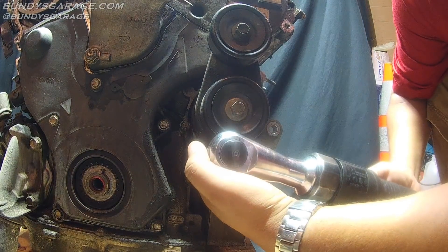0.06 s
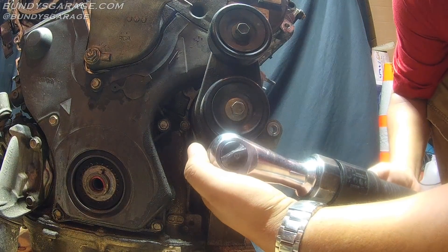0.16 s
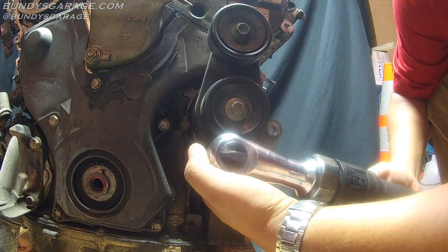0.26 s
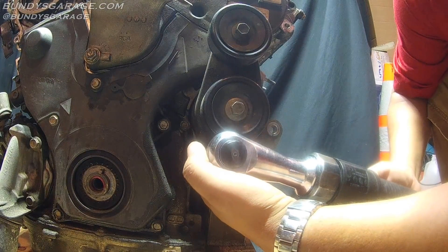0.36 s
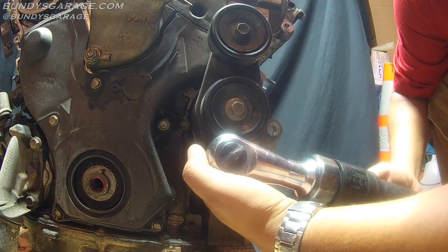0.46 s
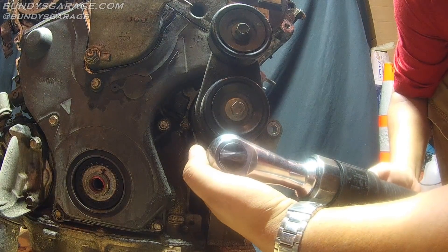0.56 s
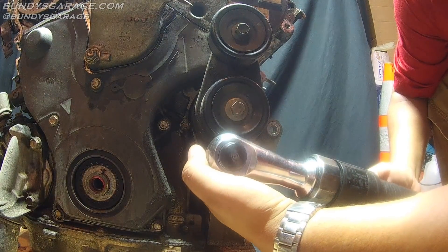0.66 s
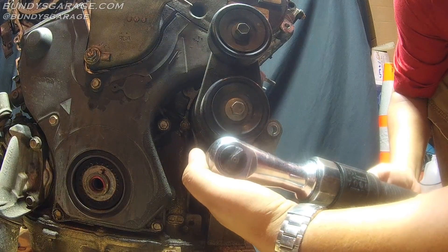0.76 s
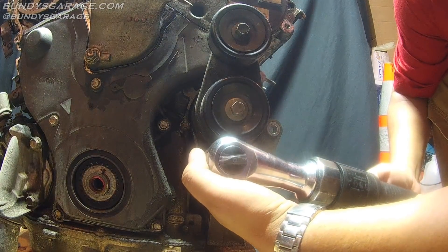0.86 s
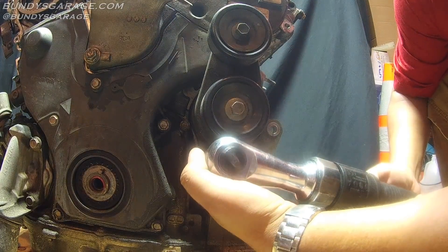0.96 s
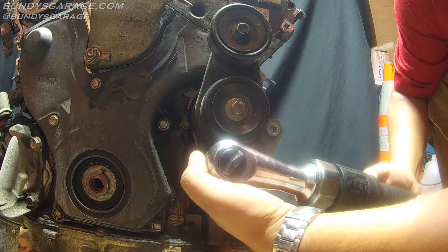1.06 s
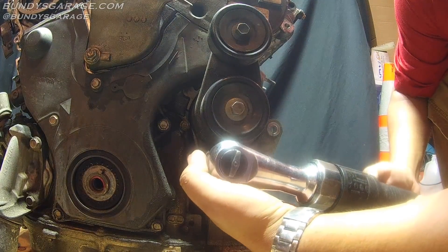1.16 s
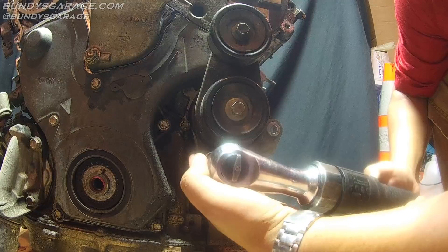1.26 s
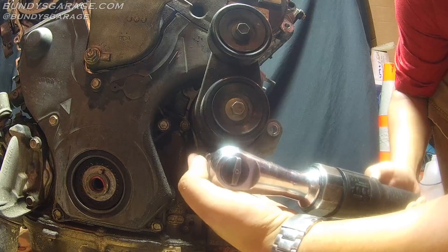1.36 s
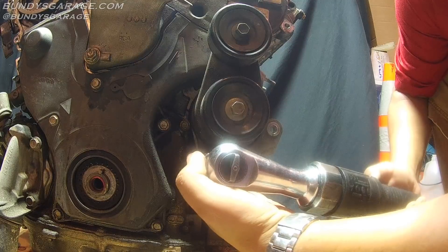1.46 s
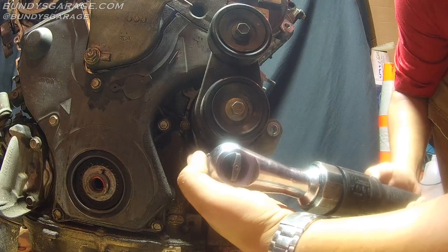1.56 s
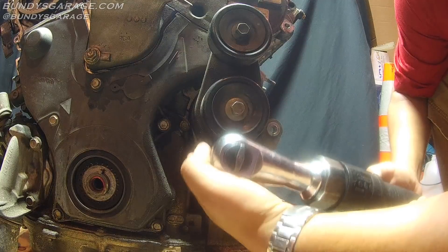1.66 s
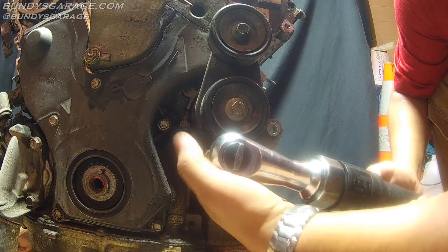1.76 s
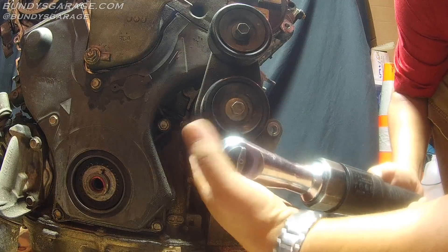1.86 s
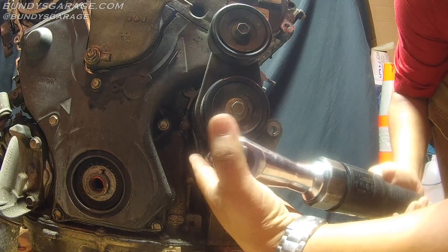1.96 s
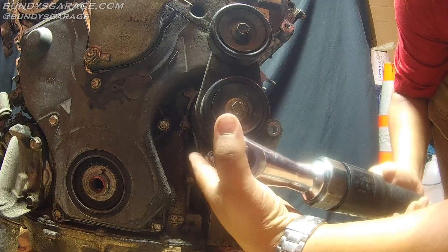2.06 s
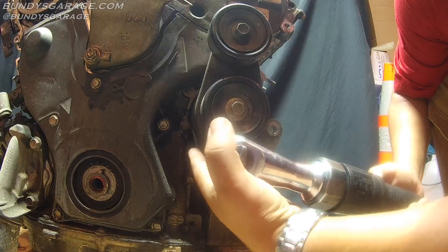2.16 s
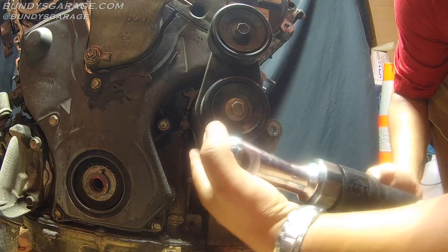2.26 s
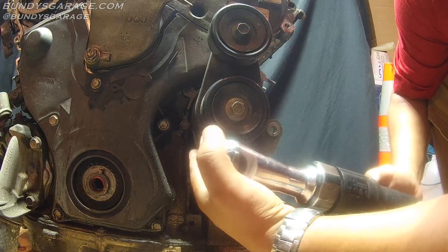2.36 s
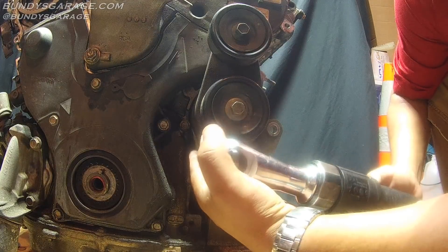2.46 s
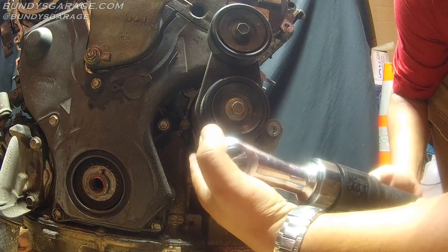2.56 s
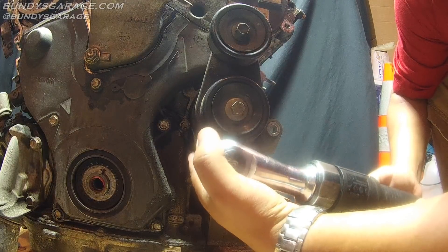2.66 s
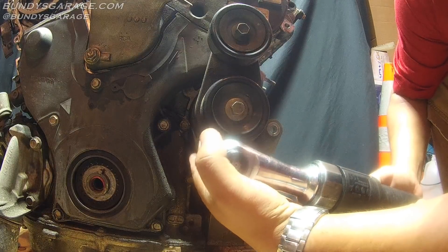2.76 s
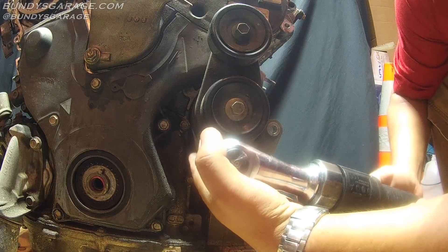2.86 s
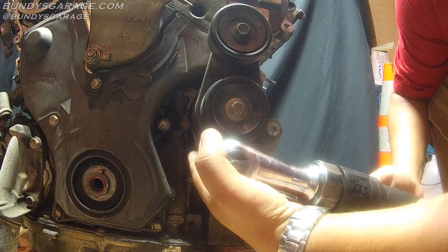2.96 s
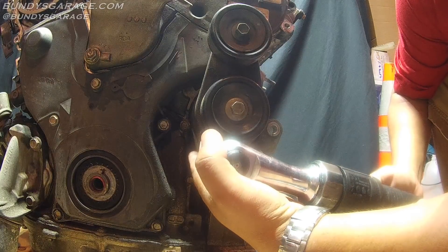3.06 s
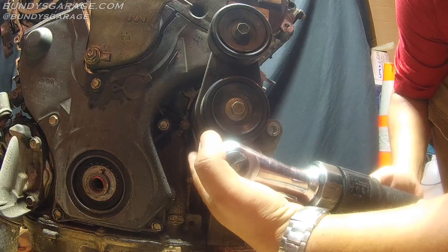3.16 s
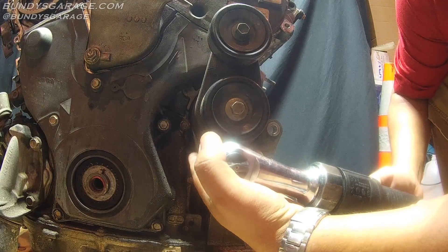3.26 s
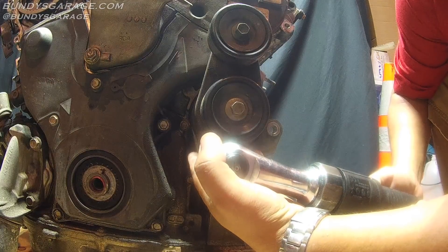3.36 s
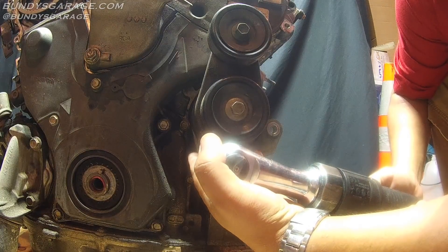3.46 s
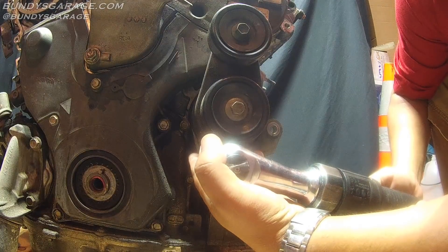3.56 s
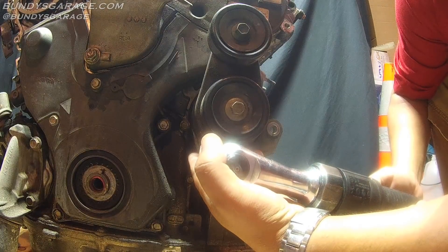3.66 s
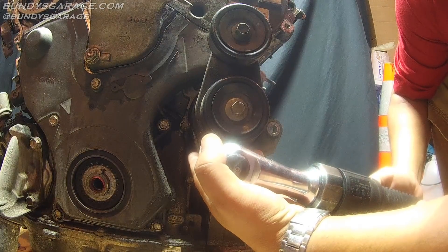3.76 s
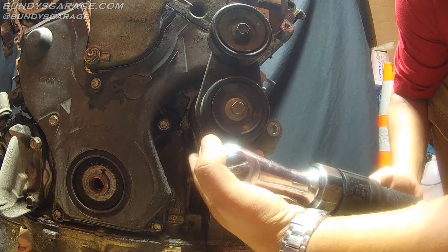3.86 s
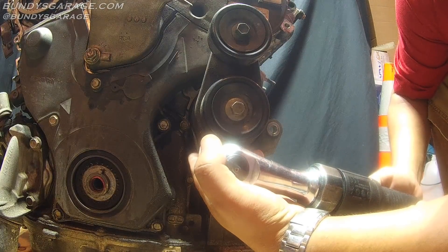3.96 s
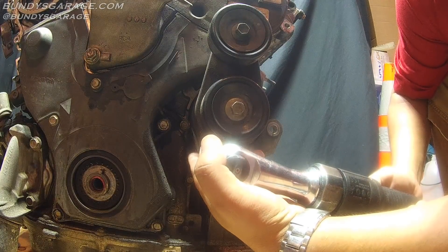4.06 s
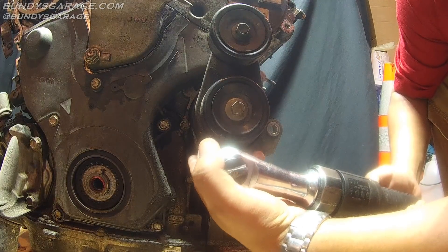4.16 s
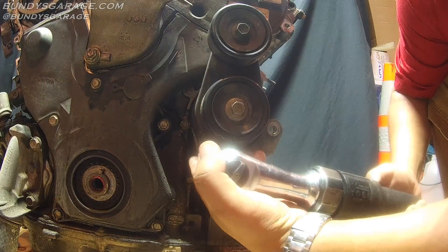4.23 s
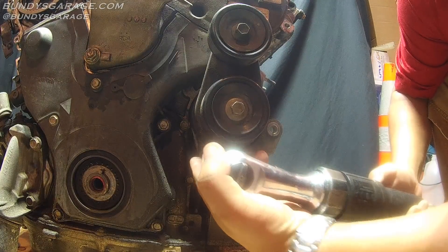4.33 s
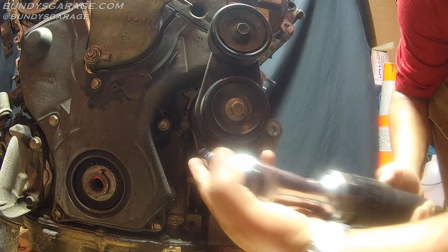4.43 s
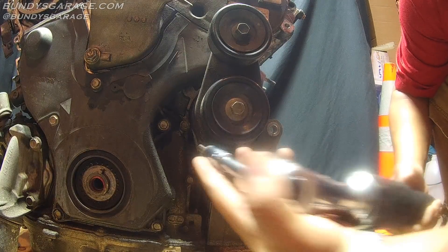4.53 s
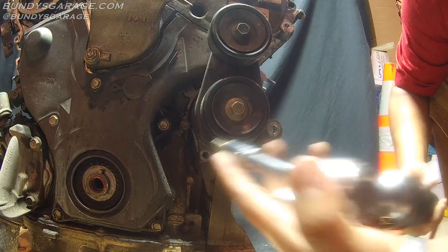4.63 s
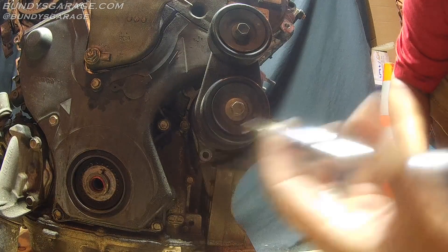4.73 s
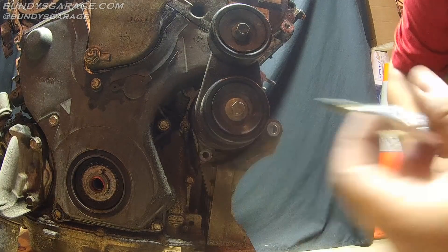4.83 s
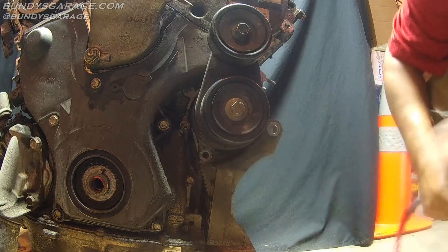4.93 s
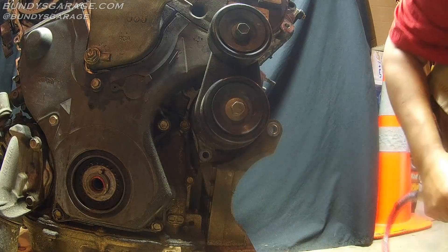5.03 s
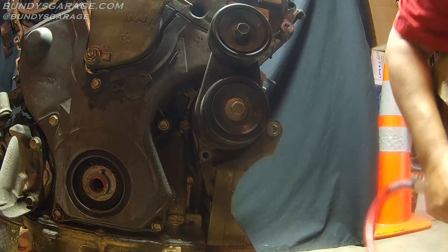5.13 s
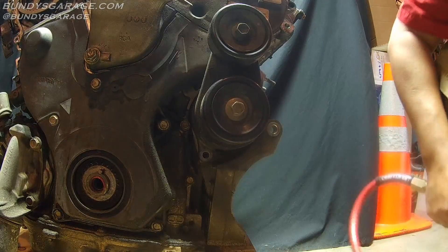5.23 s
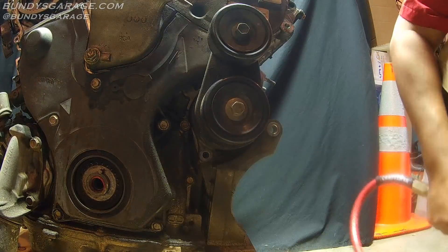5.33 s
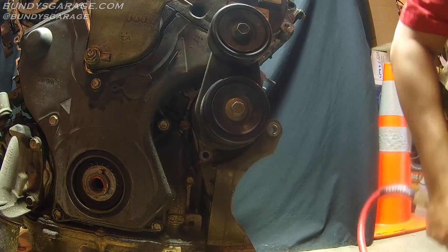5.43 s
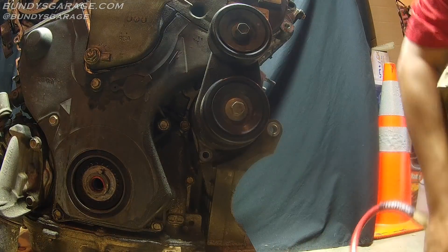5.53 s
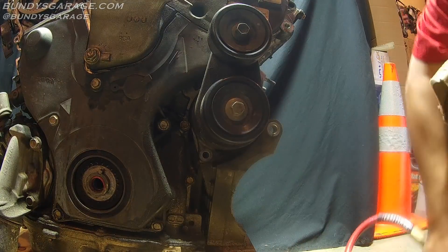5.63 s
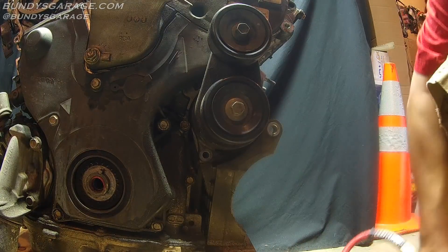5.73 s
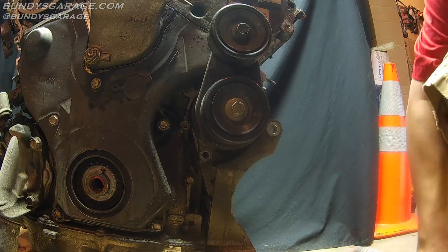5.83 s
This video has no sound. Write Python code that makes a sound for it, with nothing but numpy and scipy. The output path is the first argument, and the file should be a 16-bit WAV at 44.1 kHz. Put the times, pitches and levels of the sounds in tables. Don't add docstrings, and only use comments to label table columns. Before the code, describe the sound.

An air ratchet whines high over hissing exhaust, stops in ticks, runs again and winds down, then metal clinks and the tool thuds onto a bench.

```python
import sys
import numpy as np
from scipy import signal
from scipy.fft import rfft, irfft, next_fast_len
from scipy.io import wavfile
from scipy.ndimage import uniform_filter1d

SR = 44100
rng = np.random.default_rng(int(sys.argv[2]) if len(sys.argv) > 2 else 0)


def int16_out(signal):
    q = np.round(np.clip(np.atleast_2d(signal).T, -1, 1) * 32767)
    wavfile.write(sys.argv[1], SR, q.astype(np.int16))


def makeup_ratio(level_db):
    decades = np.asarray(level_db, float) / 20
    return 10 ** decades


N = 259749
TIME = np.arange(N) / SR
LEVEL_STEP_S = 4.818

# (opens [s], closes [s])
TRIGGER = [
    (-0.5, 1.0685),
    (2.499, 4.2097),
]
# (time [s], rate [Hz])
AIR_SPEED = [(0, 1163), (.37, 1159), (.74, 1151.5), (1.06, 1149), (2.62, 1206), (2.68, 1201), (2.8, 1179),
             (2.96, 1161), (3.15, 1152), (3.33, 1147), (3.7, 1143), (4.2, 1137.5)]
# (multiple of vane rate, level [dB])
WHINE_LINES = [(.25, -62.5), (.5, -54), (.75, -63), (1, -38), (2, -43), (3, -49), (3.75, -59), (4, -40.5),
               (4.25, -56.5), (5, -43), (6, -45), (6.975, -54.5), (7.75, -54.5), (7.97, -46.5), (9, -51),
               (11, -61.5), (12, -60), (13, -61.5)]
# (frequency [Hz], width [Hz], lift [dB])
HOUSING_MODES = [
    (3394, 80, 7.5),
    (4552, 200, 9),
    (10510, 330, 10),
]
# (frequency [Hz], level [dB])
PORT_COLOUR = [(60, -7), (150, -9.5), (450, 5), (900, -4.5), (1550, 4), (2200, -7), (3000, -8),
               (6000, -21.5)]
# (level [dB], sag [dB/s], knee [s], extra fade [dB/s])
SURGE = (-28.5, 30, .045, 700)
# (level [dB], sag [dB/s], knee [s], extra fade [dB/s])
COAST = (-23, 125, .1, 400)
# (frequency [Hz], density [dB per Hz])
HISS_COLOUR = [(350, -54), (600, -15), (1500, -15), (3000, -12.5), (5300, -10), (7600, -12), (9000, -9.5),
               (10000, -12.5), (12000, -13), (16000, -17.5)]
# (frequency [Hz], density [dB per Hz])
RUMBLE_COLOUR = [(15, -43.5), (25, -7), (255, -7.5), (288, -8.5), (438, -6.5), (565, -9), (619, -9),
                 (900, -15), (1170, -36.5), (1980, -120)]
# (frequency [Hz], level [dB], t60 [s])
HEAD_MODES = [
    (2900, -14, .006),
    (8350, -6, .007),
    (8900, -8, .006),
    (9250, -5, .008),
    (10100, -12, .005),
]
# (time [s], peak [dB])
PAWL_DROPS = [(1.1006, -26), (1.126, -19), (1.133, -19), (1.1849, -18), (1.2013, -19), (4.2245, -31),
              (4.2746, -20), (4.2824, -21.5), (4.35, -21), (4.376, -20), (4.4518, -37), (4.544, -51),
              (4.75, -62.5)]
# (time [s], peak [dB], body
# [Hz], crack [dB])
SOCKET_ROCKS = [(1.140, -26, 3250, 1), (1.149, -30.5, 5500, -11), (1.171, -37, 2840, 11),
                (1.227, -35, 2720, 7.5), (1.262, -45, 5500, -14), (2.4895, -24, 400, -24),
                (4.2915, -25.5, 3100, 5), (4.3014, -26, 5050, -12), (4.3275, -36.5, 3000, 11),
                (4.401, -45, 3360, -6), (4.4143, -34, 3260, -10), (4.4177, -36, 2700, 11.5),
                (4.4214, -41, 2930, 6), (4.4324, -33.5, 6000, 0), (4.4434, -51, 5900, -6)]
# (time [s], peak [dB], body [Hz], crack [dB])
HAND_TOUCHES = [(1.291, -64, 2875, -10), (1.329, -63, 2000, -20), (1.389, -65, 1950, -15),
                (1.457, -57, 2500, -3), (1.5725, -57, 1500, 4), (1.76, -63, 1000, 0),
                (2.15, -68.5, 5000, -1), (2.165, -54.5, 1200, 2), (2.243, -62, 5500, -3),
                (2.2567, -45, 4840, 1.5), (2.2795, -45, 5000, 12.5), (2.2835, -48, 2500, 8),
                (2.2875, -45, 1370, 15), (4.408, -42, 450, -30), (4.624, -69, 2425, 7),
                (4.7385, -67.5, 3300, 9)]
# (time [s], peak [dB], body [Hz], crack [dB])
CASTING_RINGS = [
    (1.135, -41.5, 1550, -30),
    (1.17, -43, 467, -30),
    (1.25, -53, 1600, -30),
    (4.27, -42, 1550, -30),
    (4.31, -39, 467, -31),
]
# (time [s], peak [dB], body [Hz], crack [dB])
CARRY_CLINKS = [(4.846, -36.5, 497, -2), (4.871, -43.5, 4100, 10), (4.875, -32.5, 8100, 3),
                (4.893, -45, 1500, -4), (4.913, -43, 1800, 3), (4.917, -25, 8350, -8),
                (4.930, -33, 1880, 8), (4.935, -34, 1850, 6), (4.939, -26.5, 2250, -17),
                (4.962, -22.5, 1520, 0.5), (4.969, -28, 1750, -26), (5.056, -33, 1510, -6),
                (5.064, -28.5, 2090, 1), (5.0675, -26.5, 2090, -8), (5.1135, -29.5, 9930, 4),
                (5.118, -37, 1700, -6), (5.19, -39.5, 2500, -2), (5.2475, -45, 9000, 8),
                (5.662, -45, 12900, -1), (5.6727, -26, 6600, 8.5), (5.678, -33, 10100, 0),
                (5.717, -45, 5970, -5), (5.730, -33, 7500, 5.5), (5.7442, -14, 2760, 11),
                (5.7455, -13.5, 7800, 9), (5.748, -28, 890, -14), (5.773, -26, 900, 3),
                (5.812, -34, 700, -2)]
# (time [s], peak [dB])
BENCH_HITS = [(5.7448, -8), (5.747, -29), (5.76, -31), (5.773, -19.5), (5.784, -21), (5.794, -25.5),
              (5.802, -19), (5.816, -21.5), (5.823, -29), (5.839, -27.5), (5.865, -32)]
# (frequency [Hz], level [dB], t60 [s])
BENCH_MODES = [(109.8, -7.5, .12), (144.4, -0.5, .12), (210, -12, 0.066), (291, 0, 0.063), (396, -12, 0.04),
               (483, 9, 0.024), (605, -5, 0.041), (735, -7.5, 0.066), (970, -9, 0.0212)]
# (frequency [Hz], density [dB per Hz])
RATTLE_COLOUR = [(50, -40), (110, -3.5), (200, 4.5), (450, -6.5), (800, -15), (1300, -22), (3000, -22),
                 (8000, -23.5), (16000, -36)]
# (full [s], released [s], level [dB])
HOSE_PUFF = (5.35, 5.425, -28.5)
# (frequency [Hz], density [dB per Hz])
HOSE_COLOUR = [(290, -27.5), (500, -12), (613, -21), (740, -14.5), (807, -18.5), (1090, -13), (1950, -9.5),
               (4530, -5.5), (9490, -13.5), (16000, -25.5)]
# (from [s], to [s], level [dB])
PIN_RING = [
    (5.684, 5.704, -32.5),
    (5.70, 5.81, -47),
]
# (from [s], to [s], level [dB])
GRIP_BOUTS = [
    (4.855, 4.87, -41.5),
    (5.16, 5.26, -43.5),
    (5.39, 5.545, -43),
]
# (from [s], to [s], level [dB])
DRONE_BOUTS = [
    (4.98, 5.09, -39),
    (5.295, 5.305, -38.5),
    (5.57, 5.95, -36),
]
# (frequency [Hz], density [dB per Hz])
QUIET_AIR = [(15, -4.5), (30, -5.5), (75, -14), (115, -6.5), (190, -19.5), (370, -24.5), (700, -32.5),
             (1700, -38.5), (4000, -46.5), (16000, -53.5)]
# (frequency [Hz], density [dB per Hz])
RAISED_AIR = [(15, -12), (30, 4.5), (120, -3), (260, -16), (400, -16), (620, -24.5), (1300, -29),
              (2300, -32.5), (4000, -39), (8000, -35.5), (12000, -38), (16000, -46)]
# (frequency [Hz], correlation [-1 to 1])
STEREO_LIKENESS = [(25, 0.53), (60, 0.8), (300, 0.73), (1000, 0.016), (2500, 0.52), (5000, 0.0035),
                   (9000, -0.32), (15000, -0.35)]


def rotor():
    spin_up_s, coast_s = .023, .0575
    share, drive = np.zeros(N), np.zeros(N)
    for opens, closes in TRIGGER:
        since_open = np.clip(TIME - opens, 0, None)
        since_close = np.clip(TIME - closes, 0, None)
        up = 1 - np.exp(-since_open / spin_up_s)
        share += up * np.exp(-since_close / coast_s) * (TIME < closes + .6)
        drive += up ** 2.2 * np.exp(-since_close / 0.0019)
    supply_hz = np.interp(TIME, *np.transpose(AIR_SPEED))
    return share * supply_hz * (1 + 0.00081 * drift(12)) + 1, drive


def whine(hz, phase, drive):
    out = np.zeros((2, N))
    for k, level_db in WHINE_LINES:
        lift_db = sum(db / (1 + (2 * (k * hz[::64] - f) / width) ** 2) for f, width, db in HOUSING_MODES)
        gain = np.repeat(makeup_ratio(level_db + 4 + lift_db), 64)[:N]
        gain = gain * makeup_ratio(0.5 * drift(5.2))
        gain *= 1 + .1 * drift(300)
        wander = .025 * k * drift(60)
        pan = rng.uniform(-0.28, 1)
        between_ears = [[0], [k * (.04 * pan - .11)]]
        out += gain * np.sin(k * phase + 0.5 * k * k + wander + between_ears)
    return out * drive * makeup_ratio([[1.0], [-1.0]])


def port_pulses(start, shape, tilt_db, hz, phase):
    top_db, *fall = shape
    level_db = top_db + swell(start + 0.0044, start + 0.0026, 6000, *fall)
    on = (level_db > -100) & (np.arange(N) >= start * SR)
    out = np.zeros(N)
    out[on] = makeup_ratio(level_db[on] - 21) * np.sin(2 * np.pi * 32 * np.arange(on.sum()) / SR)
    for k in range(1, 7):
        colour_db = at_hz(PORT_COLOUR, k * hz[on]) + tilt_db * np.log2(k)
        colour_db += .5 * k * drift(80)[on]
        out[on] += makeup_ratio(level_db[on] + 2 + colour_db) * np.sin(k * phase[on] + 0.5 * k * k)
    return out


def pulsing(hz, phase):
    out = np.zeros(N)
    for opens, closes in TRIGGER:
        out += port_pulses(opens, SURGE, -4.5, hz, phase)
        out += port_pulses(closes, COAST, -6.5, hz, phase)
    return out


def air_flow(level_db, sag, knee_s, fade):
    leak_s, leak_db_per_s = .042, 650
    out = np.zeros(N)
    for opens, closes in TRIGGER:
        curve_db = level_db + swell(opens - .003, closes, leak_db_per_s, sag, knee_s, fade)
        out += makeup_ratio(curve_db) * opening(opens - leak_s, leak_s)
    return out


def exhaust(phase, drive):
    chop = 1 + 0.38 * np.sin(phase) + 0.35 * np.sin(phase / 4)
    jet = air_flow(-40.5, 150, .08, 300) + air_flow(-60, 80, .26, 150)
    hiss = jet * makeup_ratio(10.5 + .5 * drift(3.6)) * chop * noise(HISS_COLOUR)
    teeth = (rng.random(N) < 900 / SR) * rng.standard_normal(N) * drive
    pawl = sum(makeup_ratio(db - 34.5) * ring(teeth, f, t60) for f, db, t60 in HEAD_MODES)
    rumble = air_flow(-49, 40, .1, 120) * makeup_ratio(2.5 + 1.5 * drift(2.7)) * noise(RUMBLE_COLOUR)
    return hiss + pawl + rumble


def taps(events, t60_s, pan_db, width_hz=650):
    out, t = np.zeros((2, N)), np.arange(12000) / SR
    snap = .7 * np.exp(-t / .0006)
    attack = 1 - np.exp(-t / 0.00021)
    crack_band = signal.butter(1, [330, 11000], "band", fs=SR, output="sos")
    pan = makeup_ratio([[pan_db / 2], [-pan_db / 2]])
    for (s, db, hz, crack_db), white in zip(events, rng.standard_normal((len(events), 2, 12000))):
        t60 = max(t60_s * 0.86 ** np.log2(hz / 3000), .004)
        burst = (white[0] + .5 * white[1] * [[1], [-1]]) * (makeup_ratio(-60 * t / t60) + snap) * attack
        edges = [hz ** 2 / (hz + width_hz), hz + width_hz]
        body = signal.sosfilt(signal.butter(2, edges, "band", fs=SR, output="sos"), burst)
        crack = signal.sosfilt(crack_band, burst)
        piece = body / np.abs(body).max() + makeup_ratio(crack_db) * crack / np.abs(crack).max()
        at = round(s * SR)
        out[:, at:at + 12000] += (makeup_ratio(db) * piece * pan)[:, :N - at]
    return out


def contacts():
    pawl_hz = 8860
    pawl = [(s, db, pawl_hz, -6) for s, db in PAWL_DROPS]
    tail = [(s, db - 23, pawl_hz, -30) for s, db in PAWL_DROPS]
    out = taps(tail, .25, pan_db=1.5)
    out += taps(pawl, .021 * 1.3, pan_db=1.0)
    out += taps(SOCKET_ROCKS, .019, pan_db=.7)
    out += taps(HAND_TOUCHES, .025, pan_db=.3, width_hz=1300)
    out += taps(CASTING_RINGS, .28, pan_db=-1.5, width_hz=107)
    out += taps(CARRY_CLINKS, .018, pan_db=1.5)
    return out


def landing():
    rattle_db, rattle_t60_s = -28, 0.56
    out, t = np.zeros(N), TIME - BENCH_HITS[0][0]
    for hz, level_db, t60 in BENCH_MODES:
        clicks = np.zeros(N)
        for s, db in BENCH_HITS:
            height = makeup_ratio(db + level_db - 10.5 + 2 * rng.normal())
            clicks[round(s * SR)] = height * rng.choice([-1, 1])
        out += ring(clicks, hz, t60)
    grain = makeup_ratio(3.6 * drift(90))
    decay = (t > 0) * makeup_ratio(rattle_db - 60 * np.abs(t) / rattle_t60_s)
    return out + decay * grain * noise(RATTLE_COLOUR)


def hose_puff():
    full, released, db = HOSE_PUFF
    curve_db = swell(full, released, 197, 340, 0.013, 440)
    puff_db = db + uniform_filter1d(curve_db, size=int(0.024 * SR))
    return opening(5.293, .022) * makeup_ratio(puff_db + 3 + 1.5 * drift(150)) * noise(HOSE_COLOUR)


def hose_squeak():
    level = makeup_ratio(-64 + swell(5.515, 5.6, 800, 400))
    return level * rms_one(ring(rng.standard_normal(N), 12200, .006))


def pin():
    pin_hz, struck_s = 13330, 5.661
    level = np.zeros(N)
    for (start, stop, db), fall in zip(PIN_RING, (1300, 650)):
        level += makeup_ratio(db + swell(start, stop, 600, fall))
    tone = np.sin(2 * np.pi * pin_hz * TIME + [[0], [-1.6]])
    return level * opening(struck_s, .002) * makeup_ratio(7.0) * tone


def garage(x):
    t60_s, wall_cut_hz = 0.6, 1500
    size = next_fast_len(N + SR)
    w = 2 * np.pi * np.fft.rfftfreq(size)
    dull = 1 / (1 + 1j * w * SR / (2 * np.pi * wall_cut_hz) * 0.27)
    out = np.zeros((2, len(w)), complex)
    for k, lag in enumerate(rng.uniform(.007, .045, size=32) * SR):
        loop = makeup_ratio(-60 * lag / SR / t60_s) * dull * np.exp(-1j * w * lag)
        out[k % 2] += loop / (1 - loop) * (-1) ** (k // 2)
    return irfft(out * rfft(x.mean(axis=0), size), size)[:, :N]


def background():
    split_hz = 250
    raised = np.clip((TIME - LEVEL_STEP_S) / 0.0048, 0, 1)
    drone = rms_one(ring(rng.standard_normal(N), 124, 0.21))
    lumps_db = bouts(GRIP_BOUTS, -50, 149)
    drone_db = bouts(DRONE_BOUTS, -57, 300)
    bass = signal.sosfilt(signal.butter(2, split_hz, fs=SR, output="sos"), noise(RAISED_AIR))
    air = signal.sosfilt(signal.butter(2, split_hz, "high", fs=SR, output="sos"), noise(RAISED_AIR))
    late = makeup_ratio(lumps_db + 3.5) * bass
    late = late + makeup_ratio(drone_db - 2.5) * drone
    late = late + makeup_ratio(-36.5 + 1.0 * drift(10)) * air
    return makeup_ratio(-63 + 0.69 * drift(6)) * noise(QUIET_AIR) + raised * late


def rms_one(x):
    return x / np.sqrt(np.mean(x ** 2) + 1e-20)


def at_hz(points, hz):
    f, value = np.transpose(points)
    return np.interp(np.log(hz), np.log(f), value)


def drift(rate):
    r = np.exp(-128 * np.pi * rate / SR)
    slow = signal.lfilter([1], [1, -2 * r, r * r], rng.standard_normal(N // 64 + 1002))[1000:]
    return np.interp(np.arange(N) / 64, np.arange(len(slow)), rms_one(slow - slow.mean()))


def ring(clicks, hz, t60):
    r, w = makeup_ratio(-60 / (max(t60, .002) * SR)), 2 * np.pi * hz / SR
    return signal.lfilter([0, np.sin(w)], [1, -2 * r * np.cos(w), r * r], clicks + 1e-18)


def noise(spectrum):
    hz = np.maximum(np.fft.rfftfreq(N + 1, 1 / SR), 5)
    alike = np.clip(at_hz(STEREO_LIKENESS, hz), -1, 1)
    mid, side = rfft(rng.standard_normal((2, N + 1))) * makeup_ratio(at_hz(spectrum, hz))
    mid, side = mid * np.sqrt(1 + alike), side * np.sqrt(1 - alike)
    return rms_one(irfft([mid + side, mid - side], N + 1)[:, :N])


def swell(start, stop, rise, sag, knee_s=1., fade=0.):
    climb = rise * np.clip(start - TIME, 0, None)
    fall = sag * np.clip(TIME - stop, 0, None)
    late_fall = fade * np.clip(TIME - stop - knee_s, 0, None)
    return -climb - fall - late_fall


def bouts(rows, rest_db, edge):
    held = [db + swell(start, stop, edge, edge) for start, stop, db in rows]
    return np.max(held, axis=0).clip(rest_db)


def opening(start, length):
    return np.clip((TIME - start) / length, 0, 1)


def scene():
    hz, drive = rotor()
    phase = 2 * np.pi * np.cumsum(hz) / SR
    port = pulsing(hz, phase) * makeup_ratio([[-.6], [.6]])
    tool = whine(hz, phase, drive) + port + exhaust(phase, drive)
    near = tool + contacts() + landing() + hose_puff() + pin() + hose_squeak()
    return near + makeup_ratio(-31.5) * garage(near) + background()


def band_limit(x):
    return signal.sosfilt(signal.butter(12, 16160, fs=SR, output="sos"), x)


def record(dry):
    ceiling = np.where(np.arange(N) < LEVEL_STEP_S * SR, .067, 1.1)
    held = dry / (1 + (dry / ceiling) ** 6) ** (1 / 6)
    held[0, 1:] = held[0, :-1]
    top_cut = signal.cheby2(14, 50, 16150, fs=SR, output="sos")
    return band_limit(signal.sosfilt(top_cut, held))


dry = scene()
out = record(dry)
int16_out(out)
```